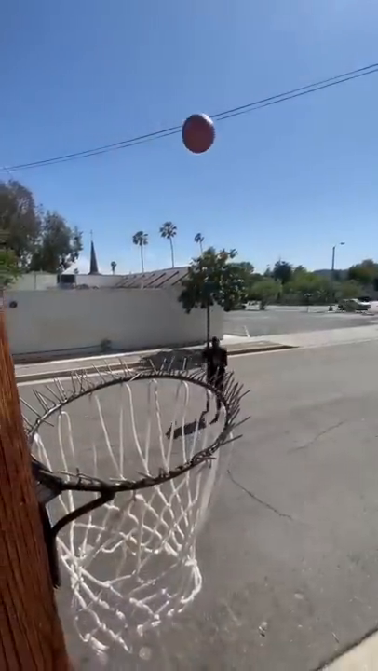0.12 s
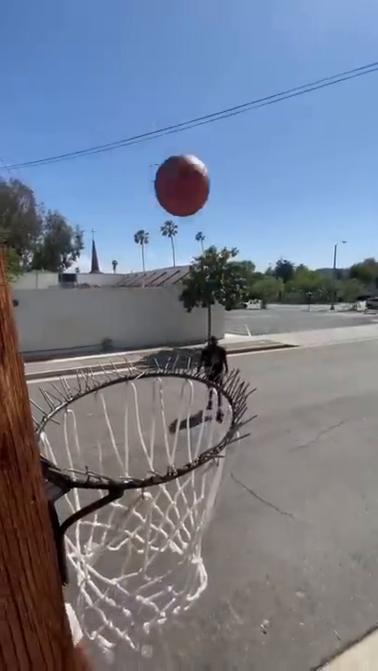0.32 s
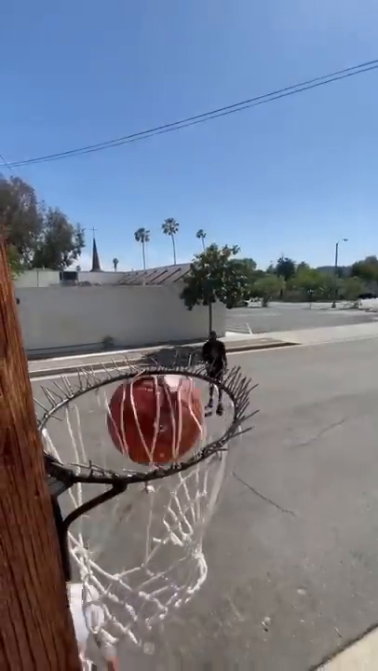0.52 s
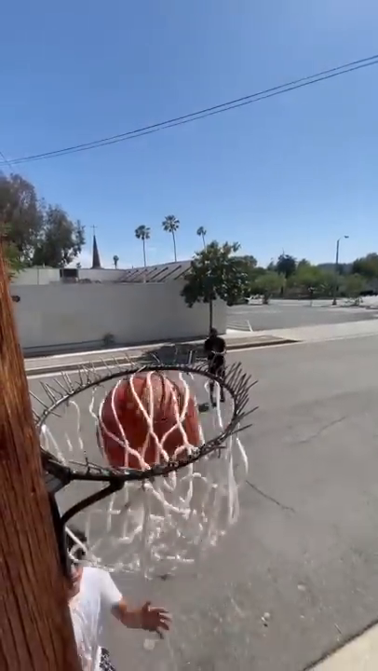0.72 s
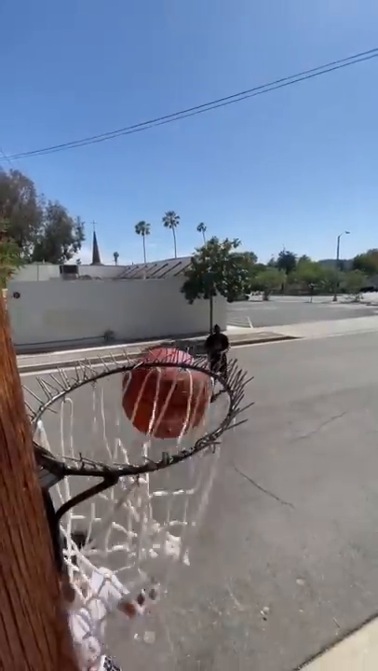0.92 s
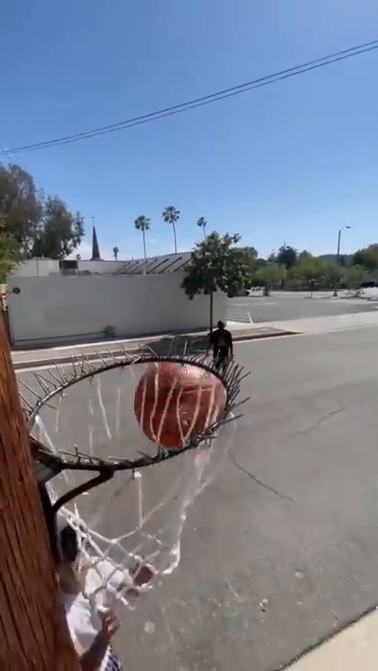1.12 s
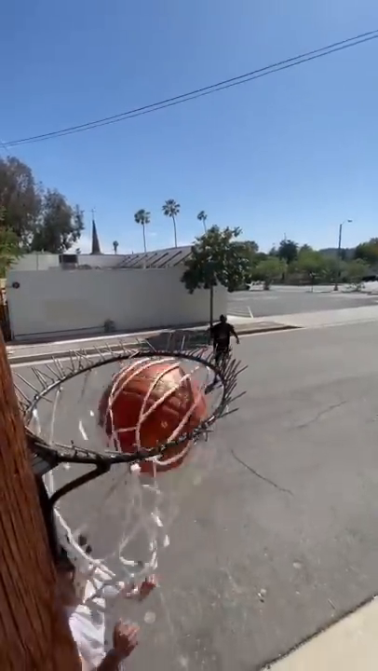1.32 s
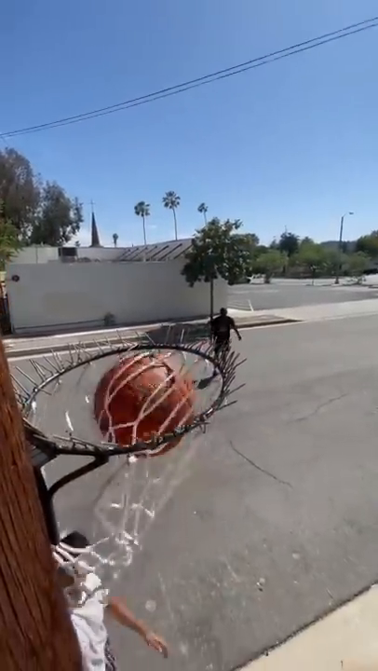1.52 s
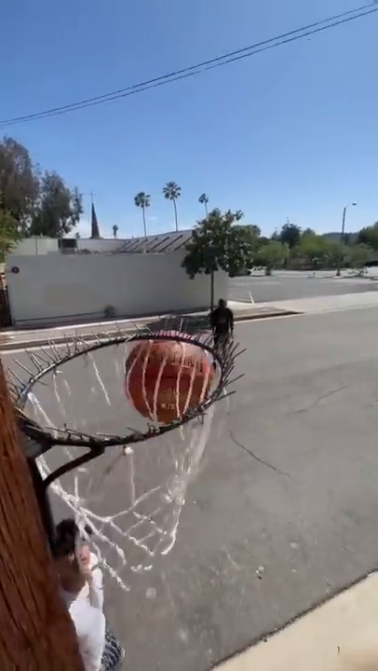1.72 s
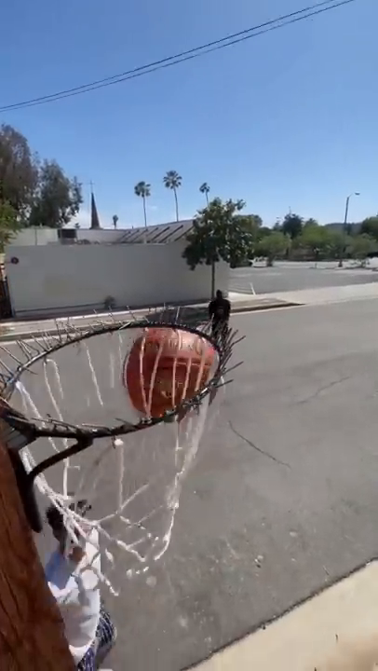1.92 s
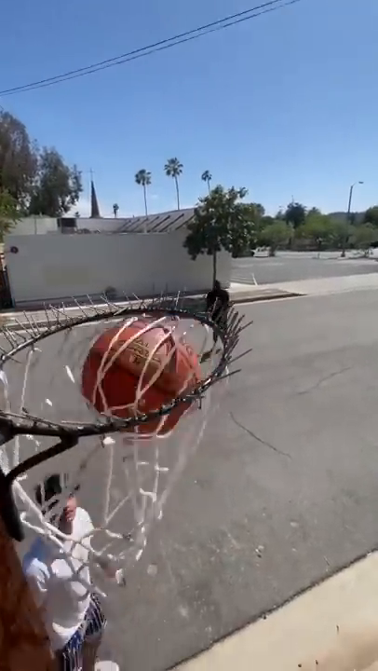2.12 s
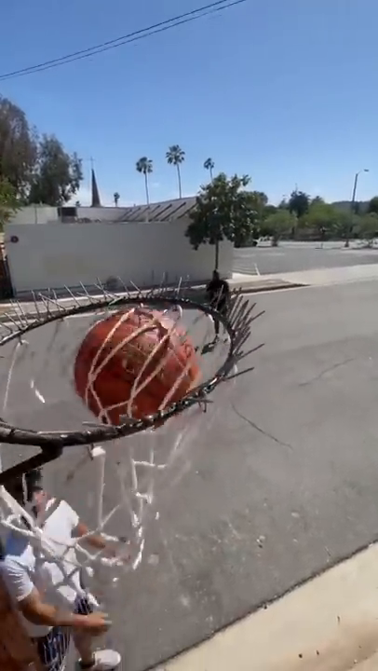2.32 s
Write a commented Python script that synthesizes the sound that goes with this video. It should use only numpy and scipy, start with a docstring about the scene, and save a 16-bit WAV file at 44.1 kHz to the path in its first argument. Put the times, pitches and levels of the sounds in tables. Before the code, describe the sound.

A basketball strikes a steel hoop with a quick clattering clank and rough metallic ring, then faint net brushes and ticks, outdoors with distant road roar and gusts buffeting a phone microphone close by.

```python
"""Gusts buffet the microphone ports of a phone (moving low noise); road traffic roars some way off (banded noise).
At 0.45 s a basketball drops onto a steel hoop: a quick clatter of contacts (short pulses ringing modes),
then a rough ring of hoop and bracket (resonant noise) while the gusts peak, near 0.7 to 0.8 s.
The net brushes the ball at 0.6, 0.8 and 1.3 s (noise swells) and ticks at 0.75 and 0.9 s (noise bursts).
The wind drops after 1.1 s and swells again near 1.9 s; the road fades toward the end."""
import sys
import numpy as np
from scipy import signal
from scipy.fft import rfft, irfft, next_fast_len
from scipy.io import wavfile
from scipy.ndimage import uniform_filter1d, map_coordinates

SR = 44100
rng = np.random.default_rng(int(sys.argv[2]) if len(sys.argv) > 2 else 0)


def wrap_up_sound(samples):
    """Save the sound to the file named by the first command line argument, as 16-bit audio."""
    columns = np.atleast_2d(samples).T
    # keep every value between -1 and 1, then stretch to whole-number steps
    tamed = np.clip(columns, -1, 1)
    steps = np.round(tamed * 32767).astype(np.int16)
    wavfile.write(sys.argv[1], SR, steps)


N = 105840
TIME = np.arange(N) / SR


def amp(db):
    """Amplitude factor of a level in dB."""
    return 10 ** (np.asarray(db) / 20)


def unit(x):
    """x scaled to rms 1."""
    return x / np.sqrt(np.mean(x ** 2) + 1e-20)


def along(points, hz):
    """(Hz, value) points read on a log frequency axis."""
    point_hz, value = np.transpose(points)
    return np.interp(np.log(hz + 1), np.log(point_hz + 1), value)


def colour(points):
    """Gain by frequency from (Hz, dB) points."""
    return lambda hz: amp(along(points, hz))


def curves(rows, t=TIME):
    """Each column after the time, read at times t; end values hold."""
    start_s, *columns = np.transpose(rows)
    return [np.interp(t, start_s, column) for column in columns]


def wobble(rate_hz):
    """Smooth random curve with rate_hz knots a second."""
    knots = rng.standard_normal(int(N * rate_hz / SR) + 4)
    return map_coordinates(knots, [TIME * rate_hz])


def filtered(x, response):
    """x times a complex response of frequency, zero-padded."""
    m = next_fast_len(N + SR // 2)
    return irfft(rfft(x, m) * response(np.fft.rfftfreq(m, 1 / SR)), m)[..., :N]


def resonances(rows):
    """Summed response of (Hz, width Hz, dB) resonators, alternating in sign."""
    def response(f):
        total = 0
        for k, (centre_hz, width_hz, gain_db) in enumerate(rows):
            damping = 1j * f * width_hz
            total = total + (-1) ** k * amp(gain_db) * damping / (centre_hz ** 2 - f * f + damping)
        return total
    return response


ATTACK_S = 0.00019


def decay(s, t60):
    """Zero before s, a quick rise, then a fall of 60 dB in t60 seconds."""
    age_s = np.maximum(TIME - s, 0)
    return (1 - np.exp(-age_s / ATTACK_S)) * amp(-60 * age_s / t60)


PATCHY_DB = 2.5  # rms


def patchy(shape):
    """White noise with patches of random gain over time and pitch."""
    z = signal.stft(rng.standard_normal(shape), nperseg=1024)[2]
    field = uniform_filter1d(rng.standard_normal(z.shape[-2:]), size=3, axis=0)
    field = uniform_filter1d(field, size=4, axis=1)
    return signal.istft(z * amp(PATCHY_DB * unit(field)), nperseg=1024)[1][..., :N]


PORT_LAG_S, LAG_ABOVE_HZ = 0.00052, 2200


def noise(gain, alike, lag_s=0):
    """Stereo noise of rms 1, gain and likeness by frequency; above LAG_ABOVE_HZ the left port leads by lag_s."""
    def mid_side_gain(hz):
        angle = np.arccos(np.clip(along(alike, hz), -1, 1)) / 2
        return gain(hz) * np.array([np.cos(angle), np.sin(angle)])

    def lead(hz):
        phase = np.pi * lag_s * np.maximum(hz - LAG_ABOVE_HZ, 0)
        return np.exp(1j * phase * np.array([[1], [-1]]))

    mid, side = filtered(patchy((2, N)), mid_side_gain)
    return unit(filtered(np.array([mid + side, mid - side]), lead))


def steady(x):
    """x held at an even level by a 3000-sample running mean power."""
    power = abs(uniform_filter1d(np.mean(x ** 2, axis=0), size=3000))
    return x / np.sqrt(power + 1e-9)


# Contacts of ball on hoop and hoop on bracket: start_s, strength_db, pitch_hz, rattle_db, bright_rattle_db
CONTACTS = [(0.4470, -10, 1490, -39, -40), (0.4483, -11.5, 2230, -25, -58), (0.4482, -23.5, 3870, -35, -63),
            (.4497, -1.5, 770, -60, -57), (.4524, -11.5, 1010, -46.5, -46), (0.4561, -3.5, 247, -49, -52),
            (.4601, -15.5, 656, -34.5, -44), (0.461, -9, 1400, -30, -44), (0.4703, -19, 900, -26.5, -36.5),
            (.4955, -29, 1020, -31.5, -35)]
# Modes of ball, hoop and bracket: pitch_hz, gain_db, t60_s
HIT_MODES = [(122, 0, .1), (275, 4, .1), (495, 6, .14), (598, 9, .16), (683, 12, .18), (768, 11, .2),
             (1155, 16, .35), (1508, 12, .12), (1710, 8, .1), (2250, 8, .12)]
KNOCK_S, KNOCK_CYCLES = 0.00037, 0.2  # pulse half-width: fixed part, plus cycles of its pitch
KNOCK_SIDE_DB, KNOCK_SIDE_LAG_S = -19.5, 0.00016


def knock():
    """Each contact is a short pulse, longer when low, that also rings the modes; it reaches the left a little late."""
    push = np.zeros(N)
    for start_s, strength_db, pitch_hz, *_ in CONTACTS:
        age_s = TIME - start_s
        bump = np.exp(-(age_s / (KNOCK_S + KNOCK_CYCLES / pitch_hz)) ** 2)
        push += amp(strength_db) * np.cos(2 * np.pi * pitch_hz * age_s) * bump
    body = resonances([(hz, np.log(1000) / np.pi / t60_s, db) for hz, db, t60_s in HIT_MODES])
    mid = push + filtered(push, body)
    early = np.interp(TIME + KNOCK_SIDE_LAG_S, TIME, mid)
    late = np.interp(TIME - KNOCK_SIDE_LAG_S, TIME, mid)
    side = amp(KNOCK_SIDE_DB) * (early - late)
    return np.array([mid - side, mid + side])


# Rattle spectrum: pitch_hz, gain_db (per Hz)
RATTLE = [(700, 9), (1300, 17), (2500, 0.5), (4500, -3), (7300, 1), (9000, -28)]
# Bright rattle spectrum: pitch_hz, gain_db (per Hz)
BRIGHT_RATTLE = [(8200, -41), (9000, 5.5), (12000, 9), (13000, -32)]
# High modes of the steel: pitch_hz, gain_db
STEEL_MODES = [(3300, -6), (4450, -3), (5130, 1), (5750, 3.5), (6150, -1), (6720, -11), (7190, -10)]
# Modes of the shaking hoop, response squared: pitch_hz, width_hz (before squaring), half_gain_db
SHUDDER_MODES = [(695.6, 41, -4), (742.6, 83, -1), (830, 53, -1.5), (1000, 104, -8)]
# Shudder over time: start_s, level_db
SHUDDER_LEVEL = [(.47, -56), (.52, -27), (.6, -33.5), (.87, -36.5), (.92, -42.5), (1.25, -42), (1.5, -48)]
# Left-right likeness of the steel: pitch_hz, likeness (clipped to -1..1)
STEEL_ALIKE = [(1500, 1), (3000, 0.13), (8000, -0.035), (8500, -1.5), (9800, -1.9), (10300, 0.093)]
RATTLE_T60_S, RATTLE_TAIL_DB, RATTLE_TAIL_T60_S = 0.016, -5.5, 0.13
STEEL_WIDTH_HZ, STEEL_DB, STEEL_T60_S = 120, -45.5, 1
STEEL_BURST_DB, STEEL_BURST_T60_S = 3, 0.35  # burst relative to the ring


def steel():
    """Rattle noise decaying from each contact, high modes ringing from the first, and the rough hoop shudder."""
    dying = np.array([decay(s, RATTLE_T60_S) + amp(RATTLE_TAIL_DB) * decay(s, RATTLE_TAIL_T60_S)
                      for s, *_ in CONTACTS])
    *_, rattle_db, bright_db = np.transpose(CONTACTS)
    rattle = amp(rattle_db) @ dying * noise(colour(RATTLE), STEEL_ALIKE)
    bright = amp(bright_db) @ dying * noise(colour(BRIGHT_RATTLE), STEEL_ALIKE)

    first_s = CONTACTS[0][0]
    fall = decay(first_s, STEEL_T60_S) + amp(STEEL_BURST_DB) * decay(first_s, STEEL_BURST_T60_S)
    high_modes = resonances([(hz, STEEL_WIDTH_HZ, db) for hz, db in STEEL_MODES])
    ring = amp(STEEL_DB) * fall * steady(noise(high_modes, STEEL_ALIKE))

    shaking = noise(lambda f: resonances(SHUDDER_MODES)(f) ** 2, STEEL_ALIKE)
    shudder = amp(curves(SHUDDER_LEVEL)[0]) * steady(shaking)
    return rattle + bright + ring + shudder


# Net on ball: middle_s, length_s, level_db
BRUSHES = [(0.625, 0.04, -50), (0.817, 0.065, -51.5), (1.315, 0.099, -44)]
# Brush spectrum: pitch_hz, gain_db (per Hz)
BRUSH = [(1200, -46), (2000, 2), (4600, -12), (6300, -8), (9900, -23), (11000, -11), (13000, -32)]
# Net cords snapping tight: start_s, level_db
TICKS = [(0.749, -50), (0.9082, -43.5)]
# Tick spectrum: pitch_hz, gain_db (per Hz)
TICK = [(2500, -14), (5500, 6), (12000, -4)]
# Left-right likeness of net and road: pitch_hz, likeness
ALIKE = [(500, 0.58), (1200, 1), (3000, 0.24)]
TICK_T60_S, GRAIN_DB, GRAIN_RATE_HZ = 0.035, 2, 220


def net():
    """Brushing cords are grainy noise swells; cords snapping tight are short noise decays."""
    swell = sum(amp(db) * np.exp(-((TIME - middle_s) / (length_s / 2)) ** 2) for middle_s, length_s, db in BRUSHES)
    grain = amp(GRAIN_DB * wobble(GRAIN_RATE_HZ))
    brushes = swell * grain * noise(colour(BRUSH), ALIKE, PORT_LAG_S)
    tick_level = sum(amp(db) * decay(s, TICK_T60_S) for s, db in TICKS)
    return brushes + tick_level * noise(colour(TICK), ALIKE, PORT_LAG_S)


GUST_TOP_HZ = 930
STEADY = 0.28  # share of chance swells held back


def buffet(rows, low_edge):
    """Low noise whose level, slope, rumble pitch and lower edge move with the gust."""
    hz, t, z = signal.stft(rng.standard_normal(N), SR, nperseg=2048, noverlap=1792)
    level_db, slope_db, rumble_hz = curves(rows, t)
    edge_hz = curves(low_edge, t)[0]
    hz = hz[:, None] + 1
    shape = amp(slope_db * np.log2(np.maximum(hz / rumble_hz, 1)))
    shape = shape / (1 + (edge_hz / hz) ** 5) / (1 + (hz / GUST_TOP_HZ) ** 6)
    z = z * shape / np.sqrt(np.mean(shape ** 2, axis=0))
    swell = np.sqrt(np.mean(abs(z) ** 2, axis=0))
    z = z * (swell / np.sqrt(np.mean(swell ** 2))) ** -STEADY
    return signal.istft(z * amp(level_db), SR, nperseg=2048, noverlap=1792)[1][:N]


# Wind in the centre: start_s, level_db, slope_db_per_octave (above the rumble), rumble_hz
WIND_MID = [(0, -37, -9, 70), (.2, -32.5, -13.5, 69), (.35, -25.5, -13, 140), (.57, -31, -6.5, 65),
            (.67, -17.5, -13.5, 62), (.74, -25, -10, 80), (.8, -18, -14, 116.4), (.9, -24, -11, 100),
            (.97, -26.5, -19, 195), (1.03, -34.5, -9.5, 59), (1.12, -59, -1, 90), (1.5, -48.5, -3.5, 100),
            (1.68, -42, -14, 119), (1.8, -37.5, -8, 104), (1.9, -29, -15, 90), (2.06, -38, -11, 72),
            (2.4, -39.5, -5.5, 71.6)]
# Wind at the sides: start_s, level_db, slope_db_per_octave
WIND_SIDE = [(0, -40.5, -28), (.36, -22.5, -8.5), (.52, -31, -13.5), (.68, -17.5, -11.5),
             (.92, -20.5, -11.5), (1.08, -28, -9.5), (1.16, -37.5, -3.5), (1.45, -36.5, -2),
             (1.72, -33, -5.5), (2.1, -42, -3.5), (2.4, -52, -2)]
# Lower edge of the side wind; the lows narrow to the centre: start_s, edge_hz
SIDE_EDGE = [(1.74, 45.3), (1.8, 124), (2.4, 413)]
SIDE_RUMBLE_HZ, MID_EDGE_HZ = 91.5, 35


def wind():
    """Turbulence at the ports: centre and sides buffet independently."""
    mid = buffet(WIND_MID, [(0, MID_EDGE_HZ)])
    side = buffet([(*row, SIDE_RUMBLE_HZ) for row in WIND_SIDE], SIDE_EDGE)
    return np.array([mid + side, mid - side])


# Road over time: start_s, roar_db, hiss_db, top_treble_db
ROAD = [(0, -36, -55, -90), (.6, -38.5, -55.5, -67.5), (1.1, -37, -53.5, -71.5), (1.55, -37, -52.5, -72.5),
        (1.85, -39, -54, -74), (2.05, -43, -56.5, -68), (2.4, -47.5, -62.5, -68.5)]
# Roar before the tyre note rises: pitch_hz, gain_db (per Hz)
EARLY_ROAR = [(150, 3), (350, 0.5), (520, -5), (780, 3), (1250, -1.5), (2600, -22.5), (3400, -59)]
# Roar after it: pitch_hz, gain_db (per Hz)
LATE_ROAR = [(500, -66), (640, -20), (720, -7.5), (830, -2), (1000, -0.5), (1260, -4.5), (2130, -20),
             (3400, -73)]
# Start and end of the turn from early to late roar: time_s
ROAR_TURNS_S = (1, 1.556)
# Far hiss spectrum: pitch_hz, gain_db (per Hz)
HISS = [(1300, -63), (2200, -1.5), (3600, -10.5), (4400, -14), (8600, -27), (13000, -57)]
# Top treble resonance, response squared: pitch_hz, width_hz (before squaring), half_gain_db
TOP_HISS = [(10800, 2000, 0)]
ROAR_WOBBLE_DB, ROAR_WOBBLE_RATE_HZ = 0.81, 13.5


def road():
    """Tyre roar, band noise that slowly turns narrower, over a far hiss and top treble."""
    roar_db, hiss_db, top_db = curves(ROAD)
    turn = np.pi / 2 * np.interp(TIME, ROAR_TURNS_S, (0, 1))  # equal-power crossfade
    early = np.cos(turn) * noise(colour(EARLY_ROAR), ALIKE, PORT_LAG_S)
    late = np.sin(turn) * noise(colour(LATE_ROAR), ALIKE, PORT_LAG_S)
    roar = amp(roar_db + ROAR_WOBBLE_DB * wobble(ROAR_WOBBLE_RATE_HZ)) * (early + late)
    hiss = amp(hiss_db) * noise(colour(HISS), ALIKE, PORT_LAG_S)
    top = amp(top_db) * noise(lambda f: resonances(TOP_HISS)(f) ** 2, ALIKE, PORT_LAG_S)
    return roar + hiss + top


def scene():
    """All sources summed in stereo."""
    return knock() + steel() + net() + wind() + road()


LOW_CUT_HZ, TOP_HZ = 48, 13050


def record(dry):
    """The phone cuts the deepest lows (two poles) and keeps nothing above its band limit."""
    def response(hz):
        low_cut = (1j * hz / (LOW_CUT_HZ + 1j * hz)) ** 2
        return (hz < TOP_HZ) * low_cut
    return filtered(dry, response)


dry = scene()
out = record(dry)
wrap_up_sound(out)
```